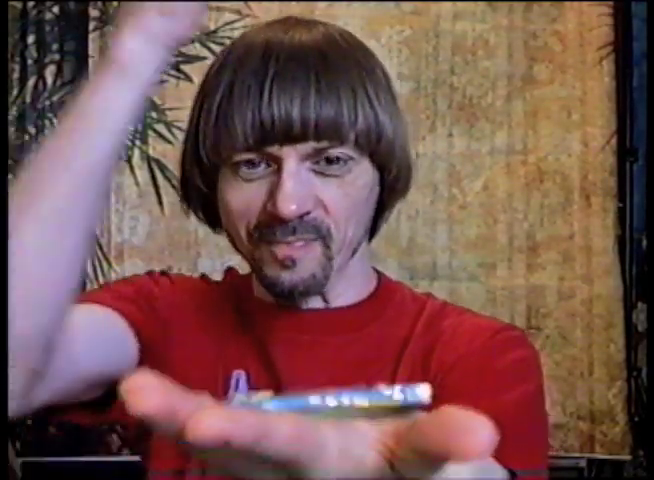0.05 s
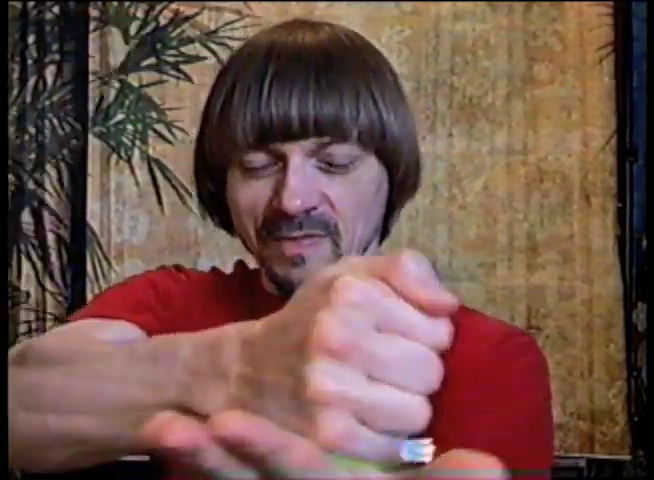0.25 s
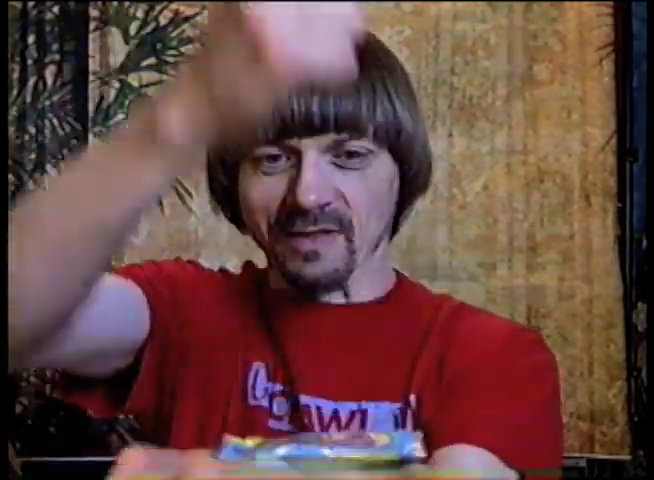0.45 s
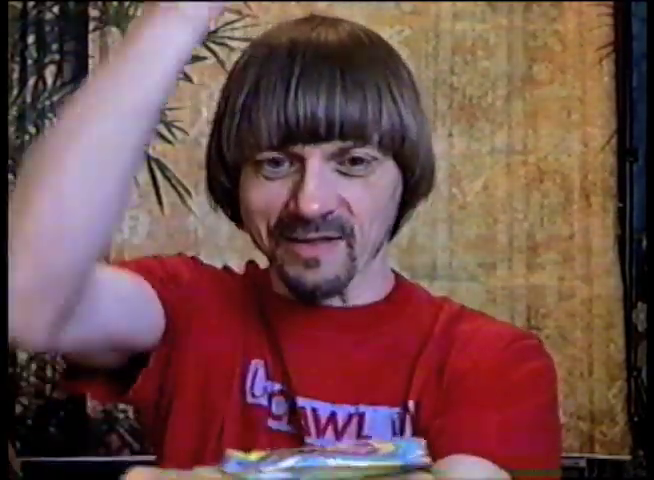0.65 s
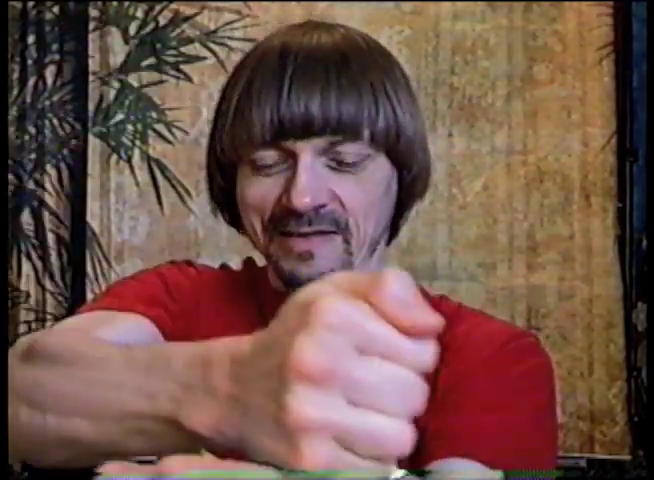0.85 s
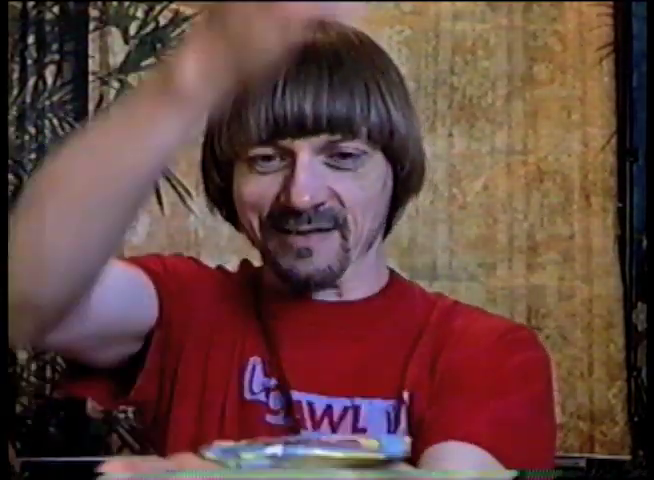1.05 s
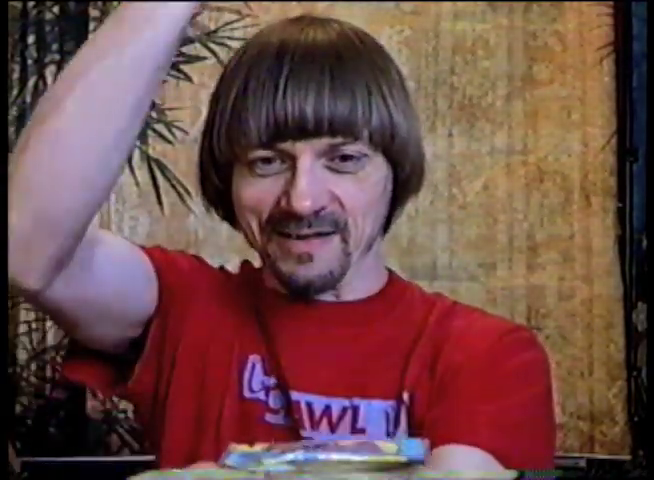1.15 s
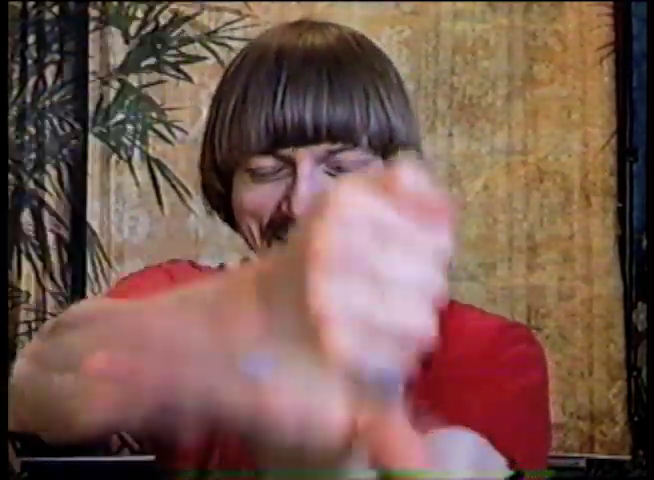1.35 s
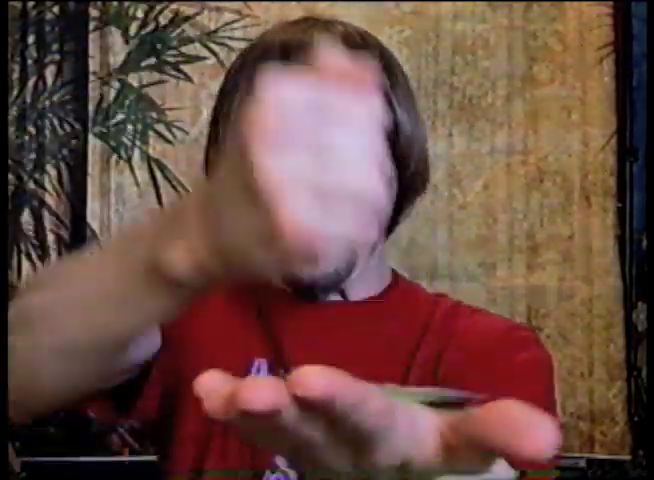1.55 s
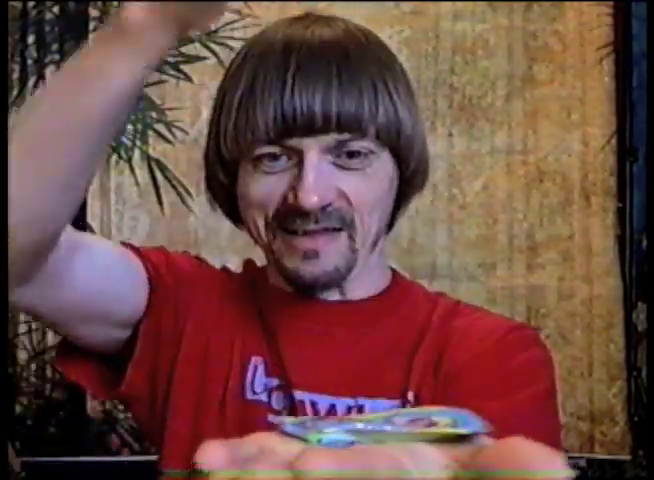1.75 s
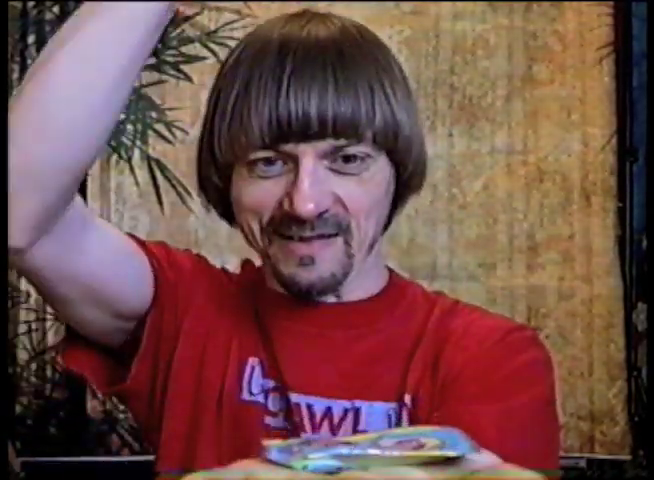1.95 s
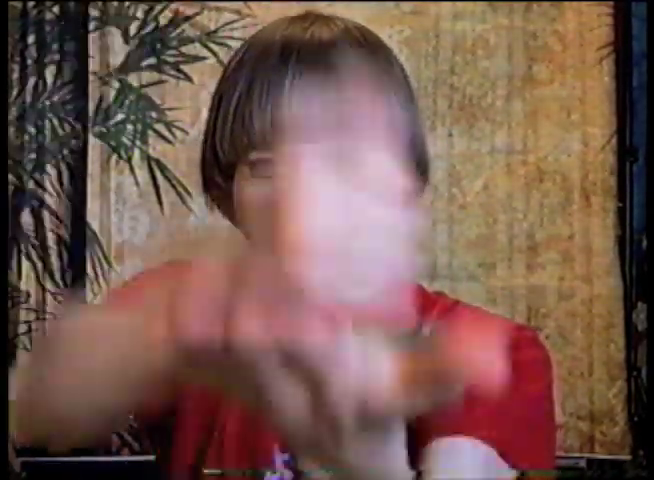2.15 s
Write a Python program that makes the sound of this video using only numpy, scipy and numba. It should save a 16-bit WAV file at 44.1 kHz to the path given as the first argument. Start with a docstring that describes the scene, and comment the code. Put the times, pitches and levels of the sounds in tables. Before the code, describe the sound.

Three hard fist smacks on a sealed foil packet, with crisp crinkles after each, small room

```python
"""Three smacks on a foil pack

A fist smacks a sealed foil pack three times in a small room, close to the microphone.
Each blow is a very short noise crack, coloured by a thump, trapped air and the ringing wrapper.
The foil crinkles in tiny ringing snaps, and the room answers with echoes and a fading tail.
Wavering mains hum, rumble and hiss lie underneath; the recorder squeezes and overloads loud peaks."""
import sys
import numpy as np
from scipy import signal
from scipy.fft import rfft, irfft
from scipy.io import wavfile
from numba import njit

SR = 44100
rng = np.random.default_rng(int(sys.argv[2]) if len(sys.argv) > 2 else 0)


def waveform_to_disk(signal):
    """Save audio, clipped to [-1, 1], as 16-bit WAV at the path in sys.argv[1]."""
    frames = np.transpose(np.atleast_2d(signal))
    scaled = np.clip(frames, -1, 1) * 32767
    samples = np.round(scaled).astype(np.int16)
    wavfile.write(sys.argv[1], SR, samples)


N = 97020  # length in samples (2.2 s)


def undb(db):
    """Turn decibels into a plain multiplier."""
    return 10 ** (np.asarray(db) / 20)


def add(out, at_s, x):
    """Mix a sound in at a time, cutting off what runs past the end."""
    i = int(at_s * SR)
    out[i:i + len(x)] += x[:len(out) - i]


def curve(points, f):
    """Read between (Hz, value) points on a log-frequency axis."""
    p = np.array(points, float)
    return np.interp(np.log(f + 1), np.log(p[:, 0]), p[:, 1])


def body(colour, resonances, size=2048):
    """How an object rings when struck: a broad colour plus damped resonances (Hz, width Hz, dB)."""
    f = np.fft.rfftfreq(size, 1 / SR) + 1
    power = undb(curve(colour, f)) ** 2
    for hz, width_hz, db in resonances:
        detune = (f * f - hz * hz) / (f * width_hz)
        power = power + undb(db) ** 2 / (1 + detune ** 2 / 2) ** 2
    # Fold the cepstrum (spectrum of the log spectrum) so that the response starts at once
    cepstrum = irfft(np.log(power) / 2)
    cepstrum[1:size // 2] *= 2
    cepstrum[size // 2 + 1:] = 0
    return irfft(np.exp(rfft(cepstrum)))


def burst(hold_s, fall_s, size=512, count=6):
    """A brief random crack of unit energy: it holds, then fades, with a nearly even spectrum."""
    t = np.arange(size) / SR
    envelope = np.exp(-np.maximum(t - hold_s, 0) / fall_s)
    x = rng.standard_normal(size) * envelope
    for _ in range(count):
        even = irfft(np.exp(1j * np.angle(rfft(x))))  # keep the phases, level the spectrum
        x = even * envelope
    return x / np.linalg.norm(x)


def smacks():
    """The fist hits: flesh thumps, trapped air pops, the wrapper rings and is crushed."""
    # Blows: start_s, level_db, crush_db, thump_db, pocket_hz, pocket_db (trapped air),
    # then four wrapper rings as ring_hz, ring_db
    blows = [(0.208, 14.95, 1, 1.5, 840, 7, 1680, 6, 2485, 11.1, 4630, 6.3, 6800, 3.5),
             (0.826, 13.1, 3, 2, 933, 4.6, 2300, 6, 3920, 6.7, 4540, 8.6, 6100, 8),
             (1.409, 11.34, -1.5, 2, 586, 11.04, 1440, 7, 2260, 10.4, 4000, 3.2, 5820, 5.5)]
    # Broad colour of a blow: pitch_hz, level_db
    blow_colour = [(60, -26), (160, -15), (300, 0.5), (1100, 3.5), (1500, 1), (3200, 3.5), (7000, 3),
                   (10000, -6), (15000, -17)]
    contact_s, contact_fall_s = 0.0019, 0.00086
    thump_hz, thump_width_hz, pocket_width_hz = 323, 406, 265
    ring_width_share = 0.23  # ring width as a share of its pitch
    crush_delay_s, crush_spread_s = 0.025, 0.007  # creases folding under the fist
    out = np.zeros(N)
    for at_s, db, crush_db, thump_db, pocket_hz, pocket_db, *rings in blows:
        thump = (thump_hz, thump_width_hz, thump_db)
        pocket = (pocket_hz, pocket_width_hz, pocket_db)
        wrapper = [(hz, hz * ring_width_share, ring_db) for hz, ring_db in zip(rings[::2], rings[1::2])]
        pack = body(blow_colour, [thump, pocket] + wrapper)
        crack = burst(contact_s, contact_fall_s)
        add(out, at_s, undb(db) * signal.fftconvolve(crack, pack))
        out += crinkle(crush_db, at_s + crush_delay_s, crush_spread_s,
                       count=8, ring_hz=4000, second_hz=5400, wander=0.28)
    return out


def foil():
    """The released wrapper springs back in single snaps over a light rustle."""
    # Wrapper rustling as the hand lifts: centre_s, spread_s, level_db
    rustles = [(0.383, .016, -17), (.985, 0.015, -23.5), (1.53, .012, -25)]
    # Creases snapping back: start_s, level_db, main_hz, second_hz, second_db (against the main ring)
    creases = [(.3410, -16, 4470, 2000, -8), (.3455, -17.5, 8500, 4000, -2), (.3507, -13, 5000, 8000, -5),
               (.3622, -5.5, 4300, 6940, -11), (0.3699, -2.5, 5900, 4200, -15), (.3848, -13, 4800, 2700, 6),
               (0.39, -6.5, 2380, 6500, -15), (0.3914, -5, 4940, 2200, -0.5), (0.3932, -17, 6700, 3180, 6),
               (.4060, -29, 4000, 6500, -4), (0.438, -7.5, 6000, 8300, -17), (0.4619, -14, 3000, 1160, 5),
               (0.4661, -10.5, 3500, 5800, -17), (0.501, -8.5, 2240, 6300, -9),
               (.7682, -23, 2580, 7600, -2), (.7780, -23, 2400, 6000, -6), (1.2900, -28, 2300, 3500, -8),
               (0.945, -5.5, 5040, 2220, -4), (.9619, -5.5, 3470, 2160, -14), (0.9734, 1, 2270, 3630, -10),
               (0.9841, -3, 3630, 1190, -1.5), (0.9856, -0.5, 2600, 4000, -3),
               (0.9885, -6, 3000, 6600, -4.5), (1.025, -24, 4180, 6000, -17),
               (1.0817, -11.5, 2180, 6640, -2), (1.0843, -6.5, 5400, 2160, -2),
               (1.0899, -23, 4400, 7550, -6), (1.147, -16, 6400, 2160, 3.5),
               (1.1883, -5.5, 4540, 5900, 1.5), (1.2970, -18.5, 1600, 2810, -3.5),
               (1.5160, -6, 3700, 2260, 3.5), (1.5266, -4, 4140, 2600, -2), (1.5384, -13, 4180, 6400, -6),
               (1.5846, -6.5, 2440, 4300, -6), (1.906, -22, 5400, 1380, 3)]
    out = sum(crinkle(db, centre_s, spread_s) for centre_s, spread_s, db in rustles)
    for at_s, db, hz, second_hz, second_db in creases:
        add(out, at_s, undb(db) * snap(hz, second_hz, second_db))
    return out


def crinkle(out_db, centre_s, spread_s, count=28, ring_hz=3200, second_hz=6000, second_db=-3,
            scatter_db=2.5, wander=0.27):
    """A cluster of small creases, each snapping with its own random loudness and pitch."""
    out = np.zeros(N)
    for k, (size, pitch) in enumerate(rng.standard_normal((count, 2))):
        place = 2 * (k + rng.random()) / count - 1  # from -1 to 1 across the cluster
        when_s = centre_s + spread_s * 1.4 * place
        scale = np.exp(wander * pitch)
        level = undb(out_db + scatter_db * size)
        add(out, when_s, level * snap(ring_hz * scale, second_hz * scale, second_db))
    return out


def snap(hz, second_hz, second_db):
    """One crease flips and rings in two modes for a few cycles."""
    # Broad colour under the rings: pitch_hz, level_db
    crease_colour = [(100, -36), (500, -20.5), (1100, -11), (2500, -17.5), (6000, -15), (9000, -17.5),
                     (15000, -31)]
    hold_s, fall_s = 0.0008, 0.00084
    width_share = 0.27  # ring width as a share of its pitch
    rings = [(hz, hz * width_share, 0), (second_hz, second_hz * width_share, second_db)]
    return signal.fftconvolve(burst(hold_s, fall_s), body(crease_colour, rings))


def room(x):
    """Wall echoes, low standing waves and a dense tail that builds up, mostly dying faster in the treble."""
    # Tail bands: pitch_hz, level_db (balance between bands), t60_s (time to fall by 60 dB)
    bands = [(78, 6, 0.38), (206, -7.5, .3), (263, -2.5, 0.32), (397, -2.5, 0.31), (670, 2.5, 0.26),
             (1070, -2, 0.27), (1600, -2, 0.29), (3000, -2, 0.23), (5000, -4.5, 0.26), (8000, -4, 0.22),
             (14000, 6, 0.21)]
    # Standing waves: pitch_hz, level_db, t60_s
    modes = [(279.4, -54.5, 0.36), (343, -60, 0.47), (148, -64, 0.42)]
    # Nearest walls: delay_s, level_db
    echoes = [(.0101, -23.5), (.0140, -20.5), (.0221, -21)]
    tail_db, early_db = -1, -3.5  # whole tail; its start before the build-up
    gap_s, build_s = 0.023, 0.0023
    t = np.arange(SR // 2) / SR
    f = np.fft.rfftfreq(len(t), 1 / SR)
    noise = rfft(rng.standard_normal(len(t)))
    tail = 0
    for k, (hz, db, t60_s) in enumerate(bands):
        # 1 at this band's pitch, sloping to 0 at its neighbours
        share = curve([(row[0], j == k) for j, row in enumerate(bands)], f)
        fade = np.exp(-np.log(1000) * t / t60_s)
        tail = tail + undb(db) * irfft(noise * share, len(t)) * fade
    early = undb(early_db)
    rise = (1 + np.tanh((t - gap_s) / build_s)) / 2
    tail *= early + (1 - early) * rise
    response = undb(tail_db) * tail / np.linalg.norm(tail)
    for hz, db, t60_s in modes:
        response += undb(db) * np.sin(2 * np.pi * hz * t) * np.exp(-np.log(1000) * t / t60_s)
    for delay_s, db in echoes:
        add(response, delay_s, undb([db]))
    return x + signal.fftconvolve(x, response)[:N]


def background():
    """Wavering mains hum from sine tones; low rumble and hiss from filtered noise."""
    # Colour of rumble and hiss: pitch_hz, level_db (before floor_db is added)
    floor_colour = [(20, -57.5), (42, -77), (68, -64.5), (100, -73.5), (200, -76.5), (280, -75.5),
                    (500, -77.5), (1000, -83), (2500, -87), (7000, -90), (9000, -90), (11000, -82),
                    (13000, -72), (16000, -51.5)]
    # Hum tones: pitch_hz, level_db (average strength before the wavering)
    hum_tones = [(30, -68), (59.5, -63), (119, -79.5), (179, -74.5), (241, -71), (302, -77.5)]
    floor_db, waver_depth = 27.5, 0.27
    t = np.arange(N) / SR
    noise = rfft(rng.standard_normal(N))
    colour = undb(curve(floor_colour, np.fft.rfftfreq(N, 1 / SR)))
    out = undb(floor_db) * irfft(noise * colour, N)
    for hz, db in hum_tones:
        # 24 random levels joined by straight lines
        drift = np.interp(t, np.linspace(0, t[-1], num=24), rng.standard_normal(size=24))
        waver = 1 + waver_depth * drift
        tone = np.sin(2 * np.pi * (hz * t + rng.random()))
        out += np.sqrt(2) * undb(db) * waver * tone
    return out


def scene():
    """The blows and the foil sound in the room, over the background."""
    return room(smacks() + foil())[None] + background()


@njit
def follow(x, keep):
    """Peak follower: rises at once, sinks slowly."""
    out, level = np.empty(len(x)), 0.
    for i in range(len(x)):
        level = max(abs(x[i]), level * keep)
        out[i] = level
    return out


def record(dry):
    """A limiter turns peaks down, the input overloads softly, and the treble is dulled and cut."""
    # Recorder's tone: pitch_hz, level_db
    recorder_colour = [(20, 1), (7000, 1), (9000, -0.5), (11000, -8), (13000, -18.5), (16000, -42.5)]
    limit_above, limit_release_s, limit_slope = 0.22, 0.016, 0.27
    ceiling = 0.23  # amplitude that the overloaded input cannot pass
    top_hz = 16200
    peak = follow(dry[0], np.exp(-1 / (limit_release_s * SR)))
    limited = dry / np.maximum(peak / limit_above, 1) ** limit_slope
    hot = ceiling * np.tanh(limited / ceiling)
    dull = signal.fftconvolve(hot, body(recorder_colour, [])[None])[:, :N]
    top_cut = signal.ellip(8, .2, 70, top_hz, fs=SR, output="sos")  # steep low-pass
    return signal.sosfilt(top_cut, dull)


dry = scene()
out = record(dry)
waveform_to_disk(out)
```